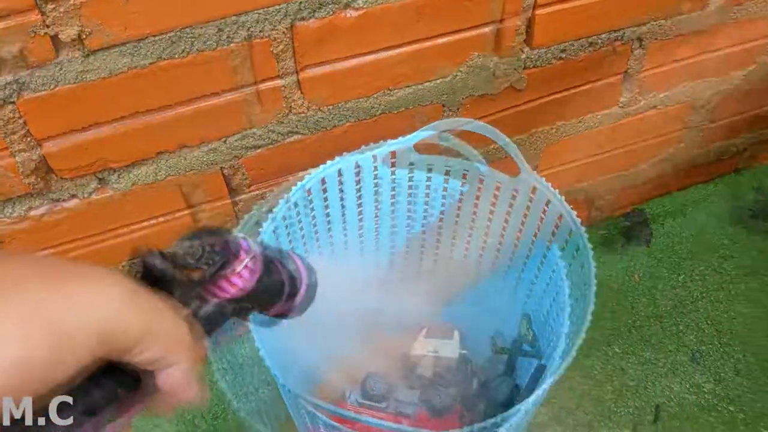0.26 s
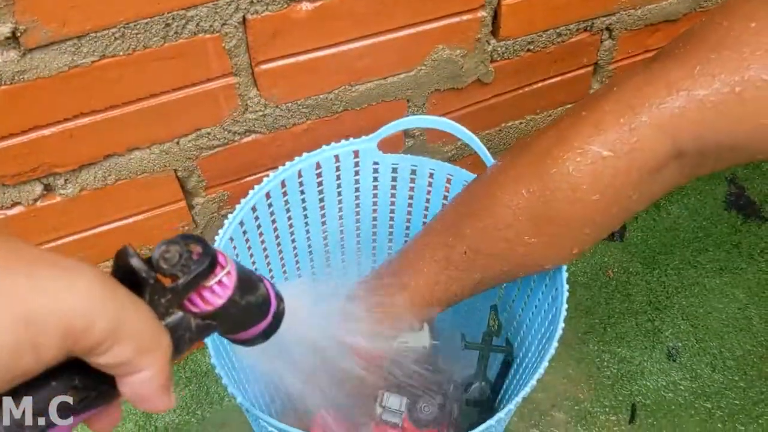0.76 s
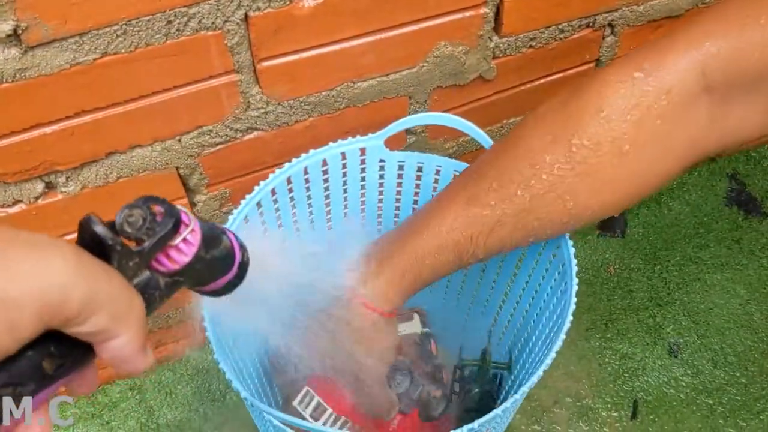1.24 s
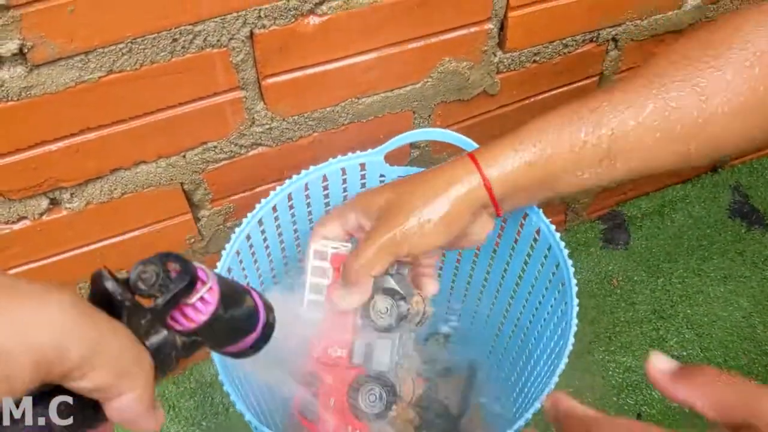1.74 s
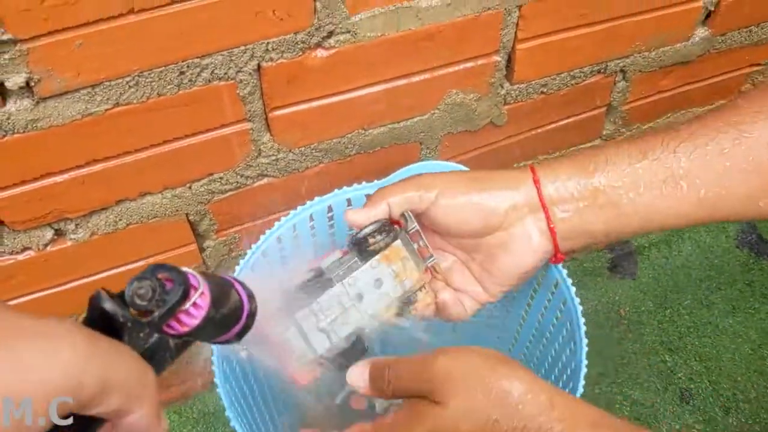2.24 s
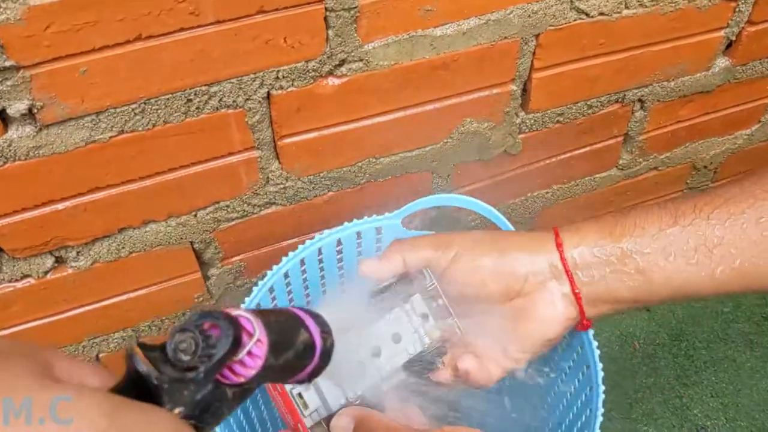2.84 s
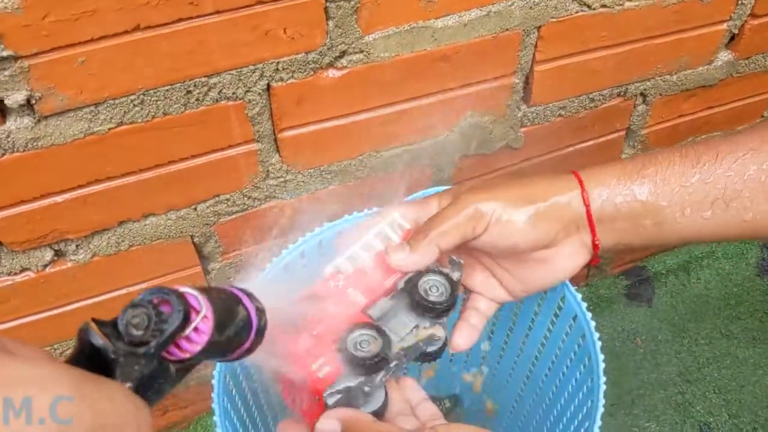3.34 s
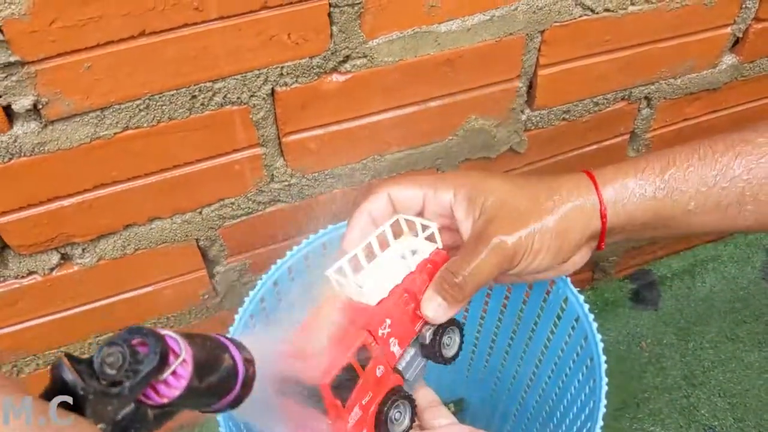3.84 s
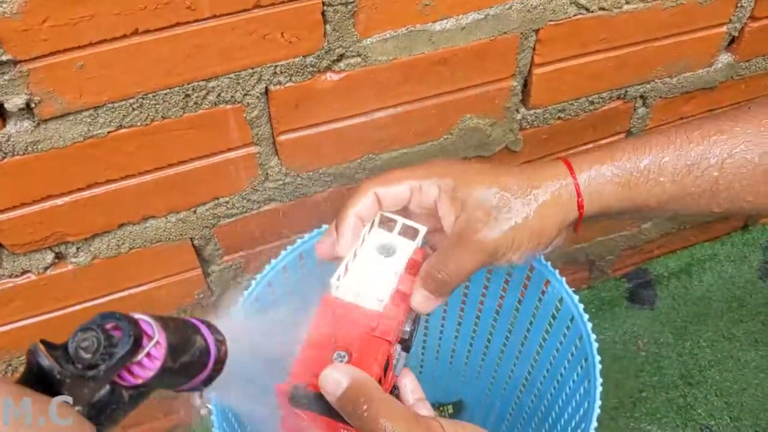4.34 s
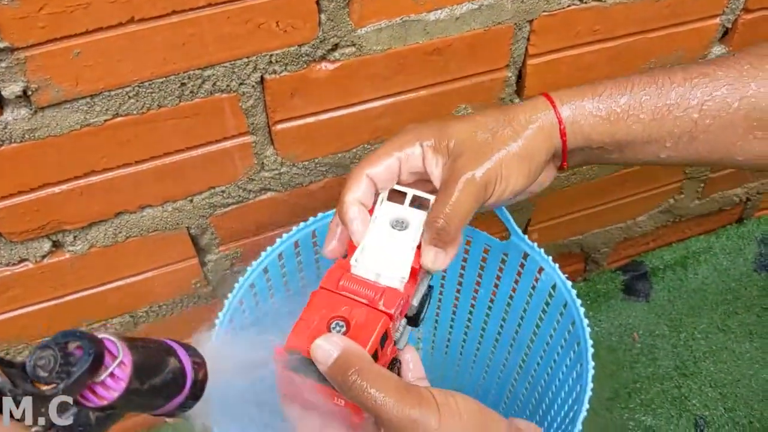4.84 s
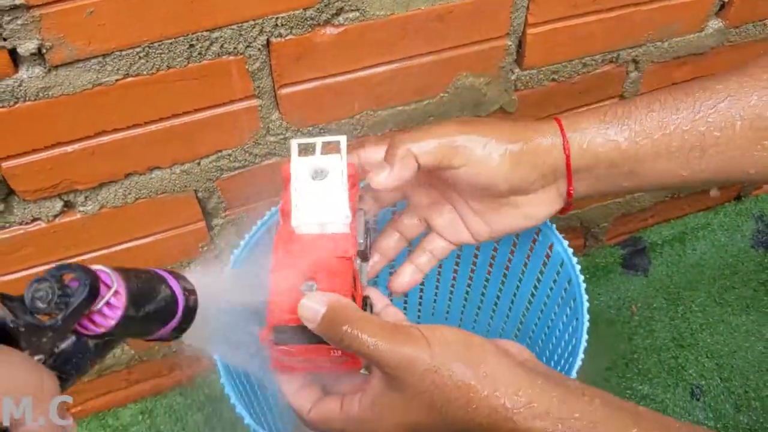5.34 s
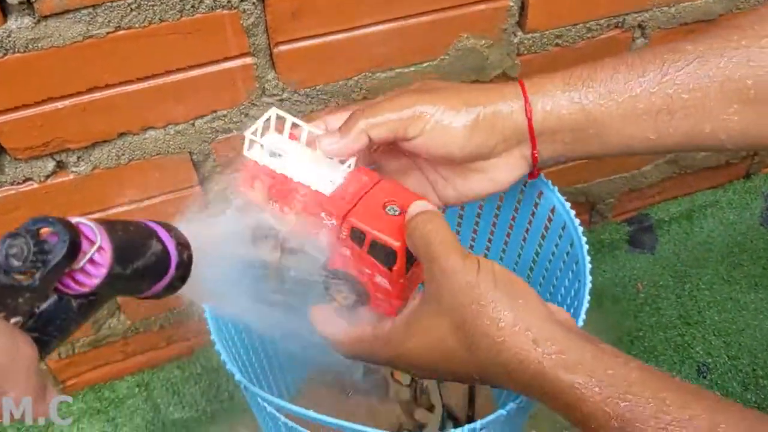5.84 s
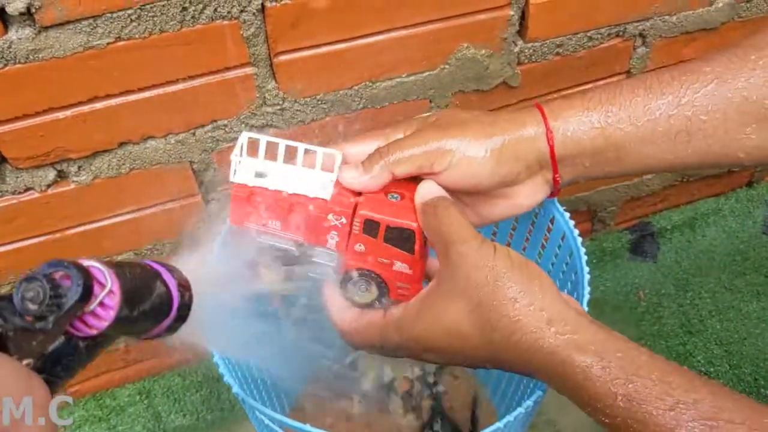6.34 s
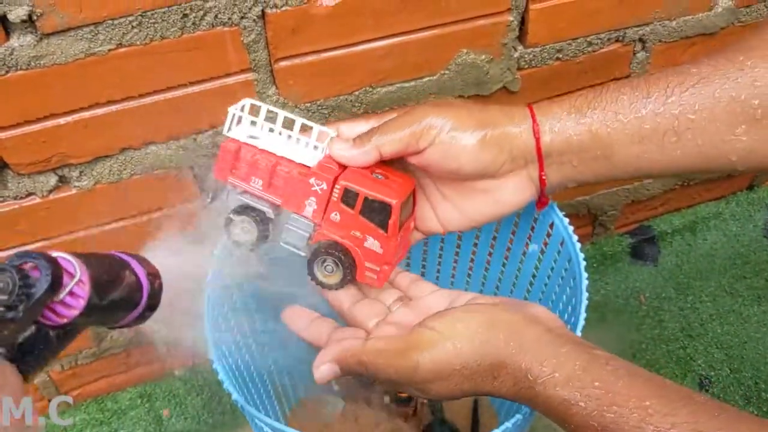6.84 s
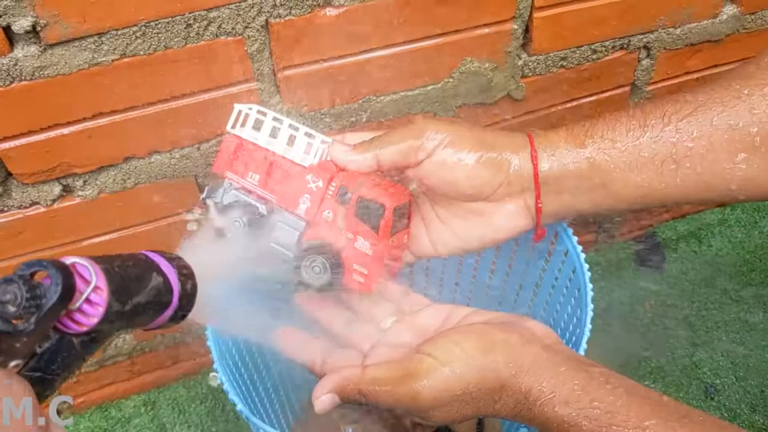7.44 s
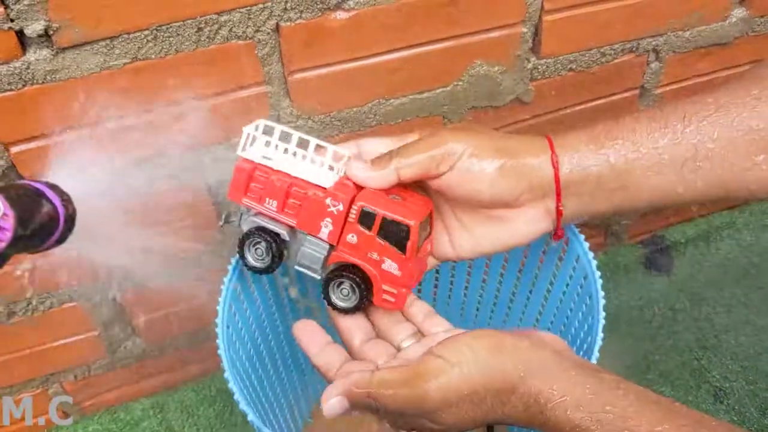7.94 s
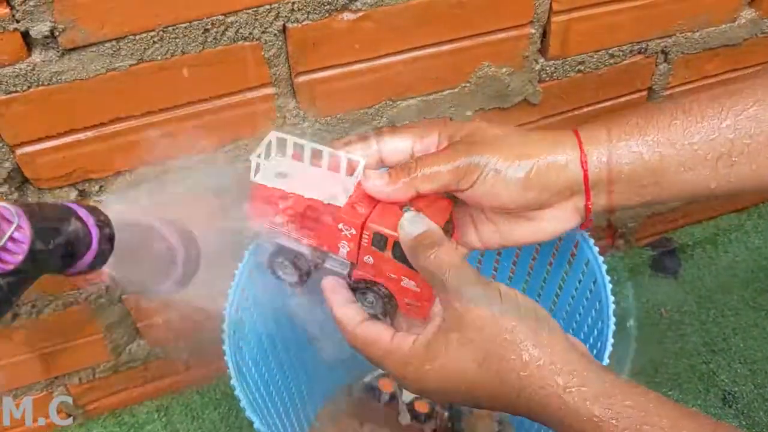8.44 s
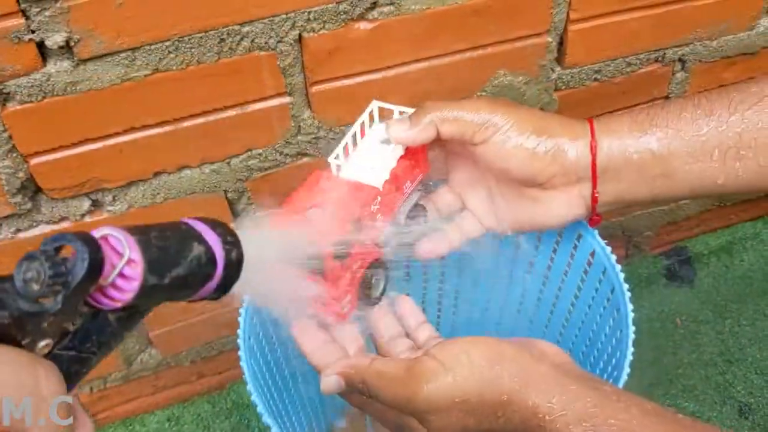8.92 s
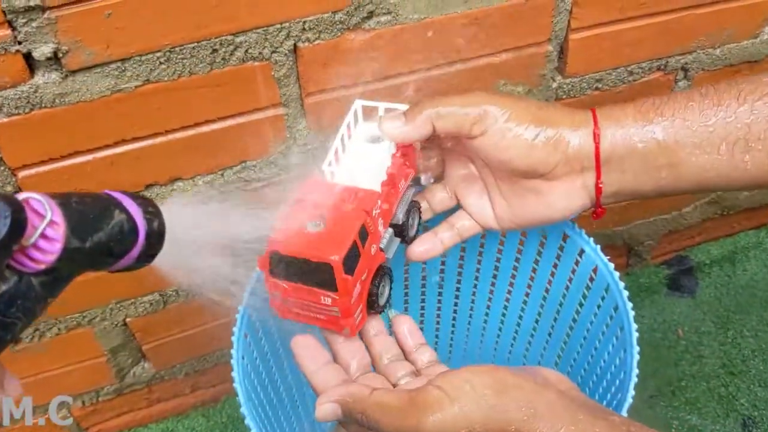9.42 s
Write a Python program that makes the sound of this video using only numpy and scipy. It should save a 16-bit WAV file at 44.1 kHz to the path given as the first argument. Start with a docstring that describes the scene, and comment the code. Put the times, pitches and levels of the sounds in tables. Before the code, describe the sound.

Outdoors, close stereo microphone: a hose nozzle sprays with constant bright hiss. The jet first drums a plastic basket, with one soft knock, then hits a lifted toy truck, spattering and gurgling in short hollow surges. Dull run-off patters below over a faint low rumble. The spray briefly misses the toy around eight seconds, and a rooster crows on the right near the end.

```python
"""A hollow plastic toy truck drums and gurgles in surges under the jet of a hose nozzle.
Random drop impacts ring the basket's side before 2 s, then the toy's shell, a wet air pocket and small cavities.
Around it, filtered impacts make hissing mist and spatter, beside a nozzle hiss of resonant noise. The toy is
turned by hand over a plastic basket. Run-off patters in the basket over a low rumble of noise, the toy
bumps the basket once as a short decaying tone, and near the end a rooster crows in gliding harmonics."""
import sys
import numpy as np
from scipy import signal
from scipy.fft import rfft, irfft, next_fast_len
from scipy.io import wavfile
from scipy.ndimage import uniform_filter1d, map_coordinates

SR = 44100
rng = np.random.default_rng(int(sys.argv[2]) if len(sys.argv) > 2 else 0)


def persist_wave(psi):
    """Save psi, clipped to +-1, as 16-bit WAV."""
    counts = np.round(np.clip(psi, -1, 1) * 32767).astype(np.int16)
    wavfile.write(sys.argv[1], SR, np.atleast_2d(counts).T)


N = 426888
T = np.arange(N) / SR  # time in seconds


def amp(db):
    """Decibels to gain."""
    return 10 ** (np.asarray(db) / 20)


def unit(x):
    """Scale to rms 1."""
    return x / np.sqrt(np.mean(x ** 2) + 1e-20)


def along(points, hz):
    """Read (pitch_hz, value) points at any frequency, on a log axis."""
    point_hz, value = np.transpose(points)
    return np.interp(np.log(hz + 1), np.log(point_hz + 1), value)


def curve(points):
    """Join (time_s, value) points into one value per sample."""
    time_s, value = np.transpose(points)
    return np.interp(T, time_s, value)


def wobble(rate):
    """A smooth random curve with rate knots a second."""
    knots = rng.standard_normal(int(N * rate / SR) + 4)
    return map_coordinates(knots, [T * rate])


def bell(middle_s, half_s):
    """A smooth rise to 1 and fall around one moment."""
    return np.exp(-((T - middle_s) / half_s) ** 2)


def filtered(x, response):
    """Shape x by a complex response of frequency."""
    size = next_fast_len(N + SR // 2)
    hz = np.fft.rfftfreq(size, 1 / SR)
    return irfft(rfft(x, size) * response(hz), size)[..., :N]


def coloured(x, spectrum):
    """Give x a spectrum, at rms 1."""
    return unit(filtered(x, lambda hz: amp(along(spectrum, hz))))


def ringing(x, modes):
    """Excite a set of parallel resonances with x, at rms 1."""
    def response(hz):
        return sum(
            amp(db) * 1j * hz * width / (centre * centre - hz * hz + 1j * hz * width)
            for centre, width, db in modes)
    return unit(filtered(x, response))


def impacts(per_second, spread_db):
    """Two streams of drop impacts of random moment, sign and size, at rms 1."""
    hit = rng.random((2, N)) < per_second / SR
    sign = np.sign(rng.standard_normal((2, N)))
    size_db = spread_db * np.clip(rng.standard_normal((2, N)), -2, 2)
    return unit(hit * sign * amp(size_db))


def patchy(x, depth_db, size):
    """Each region of pitch swells and fades on its own as the water film shifts."""
    grid = signal.stft(x, nperseg=256)[2]
    field = rng.standard_normal(grid.shape[1:])
    field = uniform_filter1d(field, 7, 0)  # smooth across pitch
    field = uniform_filter1d(field, size, 1)  # smooth across time
    return signal.istft(grid * amp(depth_db * unit(field)), nperseg=256)[1][:, :N]


def uneven(x, level_db, reach_s):
    """Add eight weak copies at random short delays, giving a fine uneven colour; rms 1."""
    delays_s = rng.uniform(.1, 1, (8, 2)) * reach_s
    copies = 0
    for pair_s in delays_s:
        copies = copies + np.array([np.roll(port, round(d * SR)) for port, d in zip(x, pair_s)])
    return unit(x + amp(level_db) * unit(copies))


def pocket(centre_hz, width_hz, waver_hz):
    """Each impact starts a short ring at the air pocket's present pitch, which wavers with the water in it."""
    envelope = filtered(impacts(per_second=900, spread_db=3), lambda hz: 1 / (1 + 1j * hz / width_hz) ** 2)
    phase = 2 * np.pi * np.cumsum(centre_hz + waver_hz * wobble(200)) / SR
    return unit(envelope * np.cos(phase))


def evened(x, span_s):
    """Even out slow chance swells in x over span_s; fast grain stays; rms 1."""
    power = np.abs(uniform_filter1d(x ** 2, int(span_s * SR), axis=-1))
    return unit(x / np.sqrt(power + 1e-20))


LEAD_S = 0.00013  # the left port hears the sound first
# Likeness of the spray at the two microphone ports, clipped to 0..1: pitch_hz, likeness (no unit)
SPRAY_LIKENESS = [(700, 3), (1300, 0.6), (2000, 0.01), (6000, 0.0941)]


def ports(pair, alike=SPRAY_LIKENESS):
    """Two unrelated sounds blend into left and right, with a set likeness and the left a little early."""
    def turn(hz):
        return np.arccos(np.clip(along(alike, hz), 0, 1)) / 2
    mid, side = filtered(pair, lambda hz: np.array([np.cos(turn(hz)), np.sin(turn(hz))]))
    early_late = np.array([[1], [-1]])
    return filtered(
        np.array([mid + side, mid - side]),
        lambda hz: np.exp(1j * np.pi * hz * LEAD_S * early_late))


# The toy is lifted out of the basket: from_s, to_s
LIFT_S = [2.0, 2.4]


def lifted():
    """0 while the toy lies in the basket, 1 once it is held above it."""
    return np.interp(T, LIFT_S, [0, 1])


# The toy is turned upright: from_s, to_s
TURN_S = [4.66, 4.9]


def upright():
    """0 while the toy shows its underside, 1 once it is upright."""
    return np.interp(T, TURN_S, [0, 1])


MISS_S = 8.05  # the jet is furthest off the toy
LEAVE_S, RETURN_S = .105, 0.081  # it drifts off slowly and comes back faster
MISS_DB, MISS_MIST_DB = -18, -1.1  # level change of spatter and of mist at that moment


def missing():
    """How far the jet is off the toy, 0 to 1."""
    return np.exp(-np.maximum((MISS_S - T) / LEAVE_S, (T - MISS_S) / RETURN_S) ** 3)


SWAY_DB, SWAY_PER_S = .5, 10  # the hand-held jet sways: depth, knots a second
# Drops landing on plastic and hands, before each layer's trim: time_s, level_db
LANDING = [(0.28, -28), (0.43, -30.5), (1.29, -30), (1.35, -35.5), (1.42, -30), (1.7, -31.5), (1.91, -29),
           (3.0, -34), (3.5, -31), (4.36, -31.5), (4.95, -28.5), (5.52, -31), (6.02, -28), (7.17, -30),
           (7.8, -27.5), (8.18, -32.5), (8.35, -29.5), (8.75, -34), (9.06, -33), (9.55, -35.5)]


def aim():
    """Level of the landing water; it drops away while the jet misses the toy."""
    return curve(LANDING) + MISS_DB * missing() + SWAY_DB * wobble(SWAY_PER_S)


RUMBLE_DB, RUMBLE_DB_PER_S = -52.5, 0.34  # level at the start, and its slow growth
SWELL_S, SWELL_HALF_S, SWELL_DB = 5.17, 0.13, 8.5  # one swell: middle, half length, rise
LOW_LIKENESS = [(70, .97), (180, .87)]  # likeness at the two ports: pitch_hz, likeness
# Tone of the yard's rumble: pitch_hz, relative level_db
RUMBLE_TONE = [(33, -40), (55, 1), (78, -2.5), (97, 4.5), (130, -3.5), (400, -15.5), (1500, -47)]


def rumble():
    """The yard's low rumble is dark random noise that grows slowly and swells once."""
    level_db = RUMBLE_DB + RUMBLE_DB_PER_S * T + SWELL_DB * bell(SWELL_S, SWELL_HALF_S)
    noise = coloured(rng.standard_normal((2, N)), RUMBLE_TONE)
    return ports(amp(level_db) * noise, LOW_LIKENESS)


# Water falling in the basket, before a 3.5 dB lift: time_s, level_db
RUN_OFF = [(0.0, -45), (3.15, -47), (5.31, -41.5), (6.06, -46.5), (6.5, -43.5), (7.9, -47.5), (8.38, -40.5),
           (8.65, -50), (9.68, -53.5)]
# Dull tone of the basket: pitch_hz, relative level_db
BASKET_TONE = [(80, -33), (122, -5), (155, 1.5), (320, 2), (420, -8), (540, -1.5), (900, -8), (2000, -50)]


def basket():
    """Run-off drops patter dully in the plastic basket."""
    patter = coloured(impacts(per_second=2500, spread_db=3.0), BASKET_TONE)
    return ports(amp(curve(RUN_OFF) + 3.5) * patter, LOW_LIKENESS)


THROAT_HZ, THROAT_WIDTH_HZ = 933, 46  # the fundamental carries only near the throat's resonance
CROW_SAG_HZ = 18.8  # each note sinks over its length
SCOOP, SCOOP_S = 0.12, 0.018  # each note scoops up and droops again: share of pitch, time
VOICING_S = 0.006  # fade in and out of each note
# The notes of the crow: start_s, length_s, pitch_hz, level_db, overtones_db
CROW_NOTES = [(8.838, 0.11, 840, -34, -1), (9.027, 0.15, 947, -32, 4), (9.225, 0.27, 939, -32, -1)]
# Harmonics of the voice: multiple (of the pitch), level_db
CROW_PARTIALS = [(1, -1.5), (2, -1), (3, -15), (6, -12)]


def rooster():
    """A thin crow of arched notes with a strong second harmonic, from the right, echoed by the yard."""
    call = np.zeros(N)
    for start_s, length_s, hz, level_db, overtones_db in CROW_NOTES:
        inside_s = np.maximum(np.minimum(T - start_s, start_s + length_s - T), 0)
        scooped_hz = hz * (1 - SCOOP * np.exp(-inside_s / SCOOP_S))
        pitch_hz = scooped_hz - CROW_SAG_HZ * np.clip((T - start_s) / length_s, 0, 1)
        roughness = .019 * wobble(500) + .004 * wobble(45)
        phase = 2 * np.pi * np.cumsum(pitch_hz * (1 + roughness)) / SR
        partials = []
        for multiple, partial_db in CROW_PARTIALS:
            shimmer_db = 2 * min(multiple, 2) * wobble(60)
            partials.append(amp(partial_db + shimmer_db) * np.sin(round(multiple) * phase))
        fundamental, *overtones = partials
        tuned = np.exp(-((pitch_hz - THROAT_HZ) / THROAT_WIDTH_HZ) ** 2)
        throat = tuned * fundamental + amp(overtones_db) * sum(overtones)
        call = call + amp(level_db) * (1 - np.exp(-inside_s / VOICING_S)) * throat
    t = T[:SR // 2]
    yard = rng.standard_normal((2, len(t))) * amp(-60 * t / .25)  # falls 60 dB in 0.25 s
    yard = yard / np.linalg.norm(yard[0])
    echo = signal.fftconvolve(call[None], yard, axes=1)[:, :N]
    return (call + .35 * echo) * amp([[-1], [2.5]])  # left and right gains in dB


def bump(start_s, level_db, pitch_hz, t60_s):
    """The toy knocks softly against the basket: one low tone, quick to rise and to die away."""
    t = np.maximum(T - start_s, 0)
    attack = 1 - np.exp(-t / 0.0021)
    return amp(level_db - 60 * t / t60_s) * attack * np.sin(2 * np.pi * pitch_hz * t)


NOZZLE_DB, NOZZLE_FOLLOWS = -29.5, 0.33  # the nozzle's own hiss, and its share of the mist's swings
# The mist over time, before a 4.5 dB lift: time_s, level_db
MIST_LEVEL = [(0.0, -31), (1.85, -27.5), (2.2, -28.5), (4.5, -29.5), (4.88, -28), (5.55, -29.5),
              (6.12, -27), (8.5, -28), (8.9, -34), (9.08, -29.5), (9.4, -29), (9.57, -35), (9.68, -25)]
# Bright tone of the mist: pitch_hz, relative level_db
MIST_TONE = [(700, -29), (1300, -11.5), (2500, -9.5), (4200, -4.5), (6900, -3), (7600, -6.5), (8800, -2.5),
             (11000, -3.5), (12800, -0.5), (14100, -5.5)]
# Hiss resonances of the nozzle: pitch_hz, width_hz, relative level_db
NOZZLE_MODES = [(11160, 350, -4.5), (11770, 300, -1.5), (12650, 420, -8.5), (14540, 220, -7)]


def mist():
    """Countless fine drops land as a bright hiss; the nozzle itself hisses higher and more steadily."""
    level_db = curve(MIST_LEVEL) + MISS_MIST_DB * missing()
    fizz = patchy(impacts(per_second=16000, spread_db=5.0), depth_db=1.5, size=12)
    fizz = uneven(coloured(fizz, MIST_TONE), level_db=-15, reach_s=.006)
    nozzle_db = NOZZLE_DB + NOZZLE_FOLLOWS * (level_db - level_db.mean())
    nozzle = amp(nozzle_db) * ringing(rng.standard_normal((2, N)), NOZZLE_MODES)
    flicker = amp(0.68 * wobble(90))
    return flicker * ports(amp(level_db + 4.5) * fizz + nozzle)


def recess_splash():
    """As the jet slides into a deepening recess the splash falls in pitch."""
    swell = np.exp(-.5 * ((T - 3.43) / 0.048) ** 2)
    fall_hz = np.interp(T, [3.38, 3.55], [3250, 2300])
    return amp(-25.0) * swell * pocket(fall_hz, width_hz=410, waver_hz=35)


# Spatter on the lifted toy lacks this band: middle, width, share lost
DIP_HZ, DIP_WIDTH_HZ, DIP_DEPTH = 1983, 230, 0.49
# The jet catches an edge of the toy and flares: middle_s, level_db, length_s (spread of the bell)
FLARES = [(1.381, -27, 0.0046), (2.435, -30, .012), (1.935, -34, 0.05), (3.416, -24, 0.0039),
          (6.13, -33, 0.043), (6.28, -29, .015), (8.193, -29.5, .025), (8.434, -27.5, 0.034)]
# Tone of the larger drops: pitch_hz, relative level_db
DROP_TONE = [(400, -32), (900, -9.5), (1400, 1.5), (1750, -1.5), (2050, -1.5), (2600, 1), (4200, 0),
             (5200, -7), (8000, -10), (15000, -17)]
# Tone of single heavy drops: pitch_hz, relative level_db
TICK_TONE = [(1200, -23.5), (2800, 1), (4500, -4), (9000, -10)]
# The toy's thin panels: pitch_hz, width_hz, relative level_db
PANEL_MODES = [(2390, 63, 2), (2657, 114, 2), (3465, 170, -2), (4260, 200, -8.5)]


def spatter(landing_db):
    """Larger drops smack the plastic in uneven clumps, flare at its edges and ring its thin panels."""
    force = amp(landing_db + 4.0 + 0.46 * wobble(90))
    for middle_s, level_db, length_s in FLARES:
        force = force + amp(level_db) * np.exp(-.5 * ((T - middle_s) / length_s) ** 2)
    smacks = coloured(patchy(impacts(per_second=6000, spread_db=2.0), depth_db=2, size=4), DROP_TONE)
    ticks = amp(-7.5) * coloured(impacts(per_second=90, spread_db=1.5), TICK_TONE)
    smacks = uneven(smacks + ticks, level_db=-13, reach_s=.006)
    band = filtered(smacks, lambda hz: np.exp(-((hz - DIP_HZ) / (DIP_WIDTH_HZ / 2)) ** 2))
    smacks = smacks - DIP_DEPTH * lifted() * band
    # the panels ring louder once the toy is turned upright
    panels_db = -16.5 + 10 * upright()
    panels = amp(panels_db) * ringing(impacts(per_second=2000, spread_db=2.0), PANEL_MODES)
    return ports(force * (smacks + panels) + recess_splash())


# The toy's low hollow note: time_s, level_db (before the surges strengthen it)
HOLLOW_LEVEL = [(0.0, -39), (0.2, -45), (0.65, -49.5), (1.9, -43), (3.3, -44), (5.0, -38.5), (5.5, -40),
                (8.1, -44.5), (8.65, -36.5), (9.33, -35.5), (9.55, -46), (9.68, -33)]
# Its inner air space sags as it is rolled over: time_s, pitch_hz
HOLLOW_PITCH = [(2.75, 675), (3.0, 635.7), (3.44, 515.1), (3.58, 668)]


def hollow(force):
    """The toy's inner air sounds low: fitful, then steadier and fed by surges once upright; flat as it rolls."""
    fitful_db = 2.2 * wobble(8) * (1 - upright())
    fed_by_jet = amp(-19.5) * force * upright()
    level = np.hypot(amp(curve(HOLLOW_LEVEL) + fitful_db), fed_by_jet)
    note = pocket(curve(HOLLOW_PITCH), width_hz=52, waver_hz=20)
    return level * evened(note, span_s=.1)


ATTACK_S, RELEASE_S = 0.007, 0.012  # the jet slides on and off
EDGE_SHARE = 0.22  # longer surges have slower edges, by this share of their length (up to 0.12 s)
GLANCING_HZ = 1451  # pitch of the shallow pocket between surges


def drumming(surges, glancing_db):
    """Force and pitch of the drumming: glancing spray, overtaken by each surge in turn, weighted by power."""
    power = amp(glancing_db) ** 2
    pitch = power * GLANCING_HZ
    for start_s, length_s, level_db, pitch_hz in surges:
        slide_s = EDGE_SHARE * min(length_s, .12)
        before = np.maximum(start_s - T, 0) / (ATTACK_S + slide_s)
        after = np.maximum(T - start_s - length_s, 0) / (RELEASE_S + slide_s)
        surge = (amp(level_db) * np.exp(-np.minimum(before + after, 20))) ** 2
        power = power + surge
        pitch = pitch + surge * pitch_hz
    return np.sqrt(power), pitch / power


GLANCING_DB = -12  # drumming between surges, relative to the landing water
FLUTTER_DB = 1.0  # the drumming flutters as the water film breaks
# Surges of drumming, on the basket's side before 2 s, then on the toy:
# start_s, length_s, level_db, pitch_hz (of the air pocket, heard only as the toy is lifted and after)
SURGES = [(0.0, 0.25, -29, 1265), (1.74, .14, -32, 1277), (1.89, 0.09, -25.5, 1414),
          (3.474, 0.11, -21.5, 1117), (3.62, .055, -25, 1080), (3.72, .02, -26, 1060),
          (3.786, 0.02, -22, 1126), (3.872, 0.027, -19, 1168), (3.972, 0.04, -23.5, 1139),
          (4.101, 0.038, -22.5, 1136), (4.185, 0.023, -23, 1298), (4.33, 0.072, -27, 1163),
          (4.617, 0.085, -27, 1196), (4.893, 0.077, -21, 1276), (5.02, 0.16, -24, 1250),
          (5.321, 0.074, -27.5, 1228), (5.54, .16, -28, 1163), (5.735, 0.054, -20.5, 1215),
          (5.815, 0.063, -18, 1212), (5.975, 0.097, -21, 1200), (6.2, 0.082, -28, 1260),
          (6.34, .1, -30, 1420), (7.445, 0.087, -18.5, 1246), (7.56, 0.28, -22.5, 1284),
          (8.168, .035, -27, 1450), (8.349, .15, -30, 1418), (8.612, .055, -21, 1230),
          (8.73, .16, -28, 1306), (8.984, 0.062, -23, 1207), (9.067, 0.36, -28, 1336),
          (9.44, .24, -34, 1293)]
# The jet sets a small cavity ringing on one narrow note, and after 8.2 s a thin panel of the toy (the 2660 Hz
# row): start_s, length_s, level_db, pitch_hz
RINGS = [(0.564, 0.044, -30.5, 1340), (0.93, .08, -33.5, 1180), (2.53, 0.1, -35, 1370),
         (2.76, .12, -42, 1760), (3.08, .28, -41, 1726), (6.405, 0.02, -24, 1380),
         (6.44, 0.15, -31.5, 1380), (7.865, 0.047, -30, 1670), (8.168, 0.037, -28, 1564),
         (8.24, .23, -37, 2660)]
# The toy's shell: pitch_hz, width_hz, relative level_db
SHELL_MODES = [(1150, 40, -5), (1201, 22, 3.5), (1338, 55, -1.5), (1607, 43, -9), (2550, 100, -15.5)]
# Its open underside: pitch_hz, width_hz, relative level_db
UNDERSIDE_MODES = [(1040, 45, -5), (1154, 91, 8), (1310, 32, 6), (1734, 86, -15)]
# The basket's side, sprayed while the toy lies in it: pitch_hz, width_hz, relative level_db
BASKET_WALL_MODES = [(1205, 75, 1.5), (1346, 100, 2), (1570, 60, -7)]


def toy(landing_db):
    """The jet drums the basket's side, then the toy's shell and wet air pocket, and rings small cavities."""
    force, pocket_hz = drumming(SURGES, landing_db + GLANCING_DB)
    ring_force, ring_hz = drumming(RINGS, -70)
    drops = impacts(per_second=2500, spread_db=3.5)
    shell = np.sqrt(upright()) * ringing(drops, SHELL_MODES)
    shell = shell + np.sqrt(1 - upright()) * ringing(drops, UNDERSIDE_MODES)
    gurgle = pocket(pocket_hz, width_hz=87, waver_hz=30)
    body = amp(-2.5) * shell + amp(-3.5) * gurgle
    basket_wall = ringing(drops, BASKET_WALL_MODES)
    body = np.sqrt(lifted()) * body + np.sqrt(1 - lifted()) * basket_wall
    drum = force * amp(FLUTTER_DB * wobble(80)) * evened(body, span_s=.08)
    cavity = pocket(ring_hz, width_hz=58, waver_hz=25)
    drum = drum + ring_force * evened(cavity, span_s=.03)
    # a small shell radiates little bass: pitch_hz, level_db
    radiation = [(600, -2.5), (880, -18.5), (1030, -2.5), (4000, 7.0), (8000, -5)]
    drum = filtered(drum, lambda hz: amp(along(radiation, hz)))
    return ports(drum + hollow(force), [(700, 1.0), (2700, 0.6)])  # left and right alike in the lows


def scene():
    """All sources at the two ports."""
    landing_db = aim()
    yard = rumble() + basket() + rooster()
    knock = bump(start_s=1.383, level_db=-15.0, pitch_hz=244, t60_s=0.028)
    return yard + knock + mist() + spatter(landing_db) + toy(landing_db)


TOP_HZ = 15780  # band limit
# Difference in colour between the ports: pitch_hz, left_minus_right_db
PORT_LEAN = [(150, 1), (680, 1), (1150, -3), (1420, -1), (1620, 3), (2000, 0), (3600, -5), (5000, 2),
             (6500, 5), (7800, 11.5), (10000, 12.5), (12200, 4.5), (13600, -7.5), (15500, 13)]


def record(dry):
    """Each port has its own colour at equal summed power; nothing is kept above the band limit."""
    def colour(hz):
        gains = amp(along(PORT_LEAN, hz) * np.array([[.5], [-.5]]))
        return gains / np.sqrt(np.mean(gains ** 2, axis=0)) * (hz < TOP_HZ)
    return filtered(dry, colour)


dry = scene()
out = record(dry)
persist_wave(out)
```